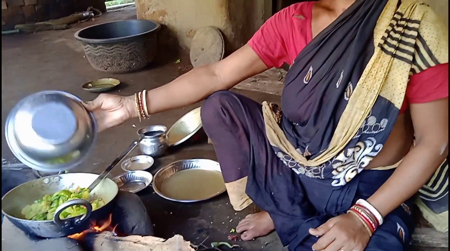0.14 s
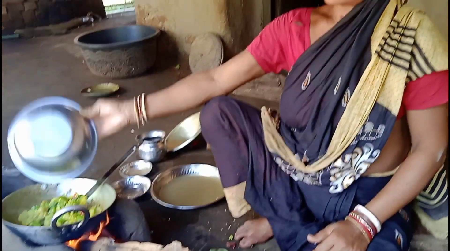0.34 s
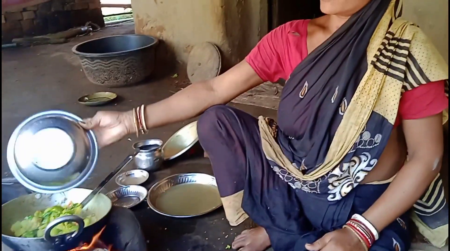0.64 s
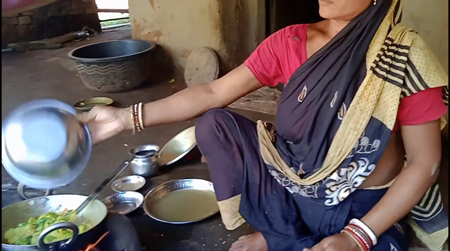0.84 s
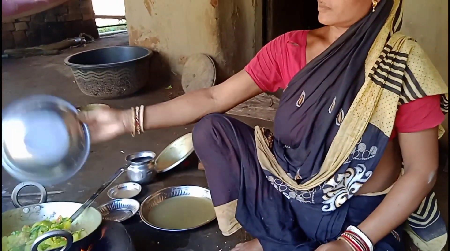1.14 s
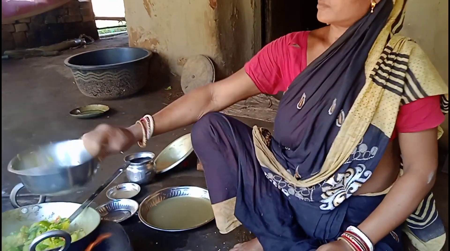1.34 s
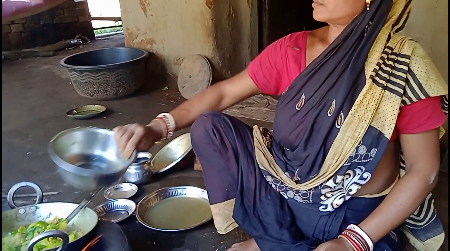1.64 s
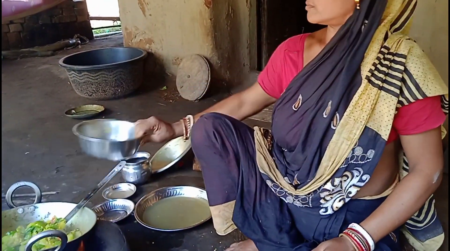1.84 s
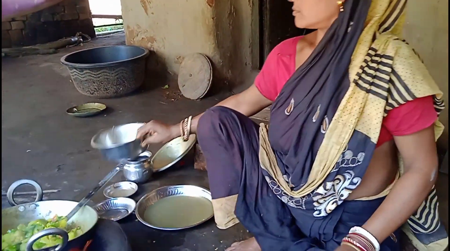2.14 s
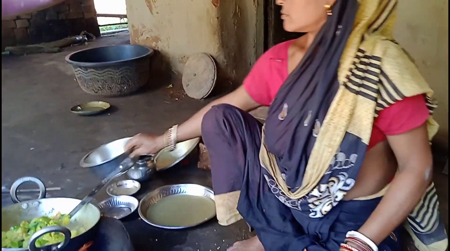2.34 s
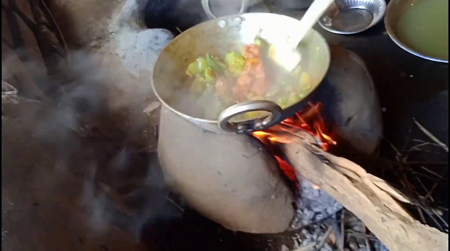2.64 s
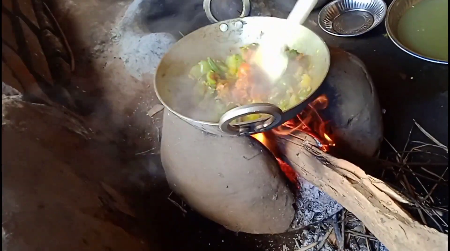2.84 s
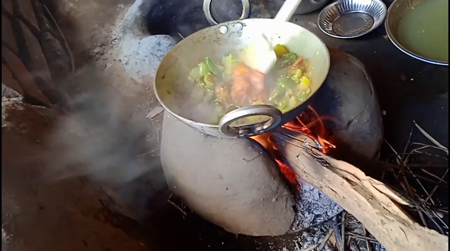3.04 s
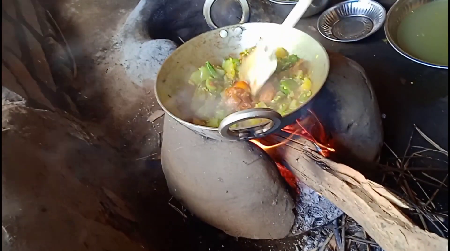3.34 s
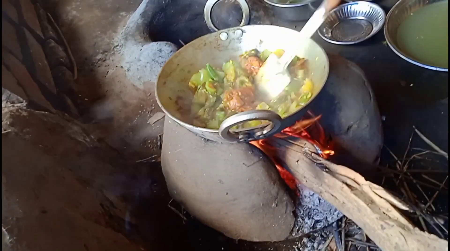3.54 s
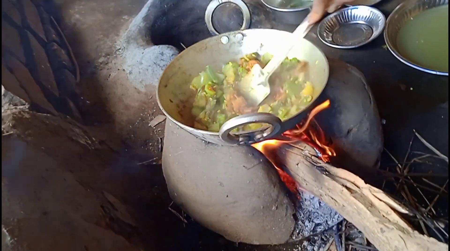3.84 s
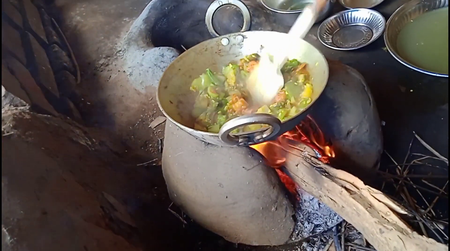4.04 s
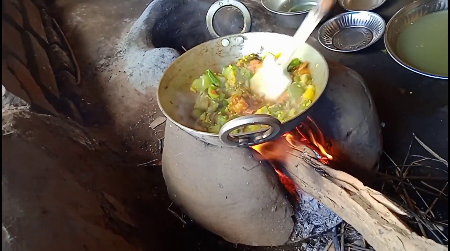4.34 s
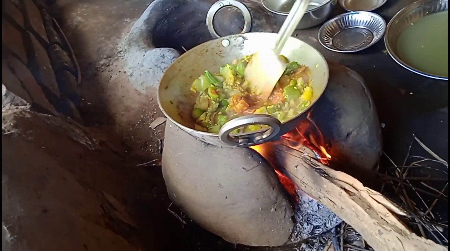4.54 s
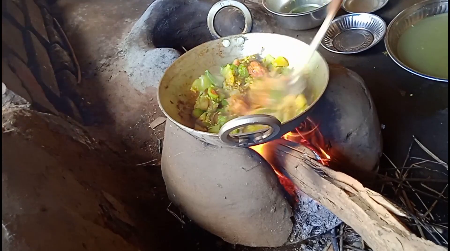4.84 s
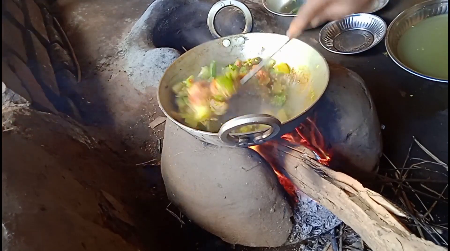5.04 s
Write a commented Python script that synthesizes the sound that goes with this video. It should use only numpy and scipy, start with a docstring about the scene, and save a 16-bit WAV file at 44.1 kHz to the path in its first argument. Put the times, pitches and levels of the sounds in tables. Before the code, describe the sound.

Moist, crackling frying over a low fire murmur, turning more resonant midway, with light bowl taps, soft knocks, then scraping and steel spatula clanks.

```python
"""Chopped vegetables sizzle in a metal pan on a wood-fired clay stove, heard first from the side, then from above.
The sizzle is random clicks and steam noise through a coloured response; the fire murmurs below as shaped noise.
A steel bowl is tapped empty (decaying modes), food is turned and a dull bump sinks in pitch.
A steel spatula strikes the pan in two groups of blows (modes and clatter) and scrapes along it (resonant friction).
Sparse decaying echoes stand for the near walls."""
import sys
import numpy as np
from scipy import signal
from scipy.fft import rfft, irfft
from scipy.io import wavfile
from scipy.ndimage import uniform_filter1d

SR = 44100
rng = np.random.default_rng(int(sys.argv[2]) if len(sys.argv) > 2 else 0)


def file_out(sig):
    """Save sig as 16-bit WAV at sys.argv[1]."""
    # one column per channel
    cols = np.atleast_2d(sig).T
    # limit, then scale
    lim = np.clip(cols, -1, 1)
    pcm = np.round(lim * 32767).astype(np.int16)
    wavfile.write(sys.argv[1], SR, pcm)


N = 228879
TIME, FREQ = np.arange(N) / SR, np.fft.rfftfreq(N, 1 / SR)  # s, Hz
RING_T = np.arange(SR // 2) / SR  # s since a blow
CLOSER_S = 1.662  # from here on the pan is heard from above

# Spatula blows and their bounces. Each row: start in seconds, relative levels in dB of the ring,
# the clatter and the squeak, place of impact from 0 (bottom) to 1 (wall).
SPATULA_BLOWS = [(4.038, -36.5, -38, -42, 0.66), (4.0496, -30.5, -31.5, -50, 0.0034),
                 (4.055, -42, -30.5, -30.5, 0), (4.064, -42, -42, -47, 0.42), (4.073, -45, -49, -41, 0),
                 (5.0981, -34, -36, -48, 0.81), (5.109, -33, -35, -36.5, 1), (5.115, -35, -41, -43, 1),
                 (5.129, -49, -40.5, -47, 1)]


def amp(db):
    """Logarithmic level: decibels to amplitude gain."""
    return 10 ** (np.asarray(db) / 20)


def unit(x):
    """Normalisation by signal power: scales to rms 1."""
    return x / np.sqrt(np.mean(x ** 2) + 1e-20)


def read(points, hz):
    """Spectral envelope: interpolates (Hz, value) points on a log-frequency axis."""
    f, value = np.transpose(points)
    return np.interp(np.log(hz + 1), np.log(f + 1), value)


def dying(t, t60):
    """Exponential decay, 60 dB down at t60."""
    return np.exp(-np.log(1000) * t / np.maximum(t60, 1e-3))


def onset(t, rise_s):
    """Exponential approach to full amplitude with time constant rise_s."""
    return 1 - np.exp(-t / rise_s)


def add(mix, s, sound):
    """Superposition: adds a sound to the mix from time s."""
    part = mix[max(round(s * SR), 0):][:len(sound)]
    part += sound[:len(part)]


def noise(colour, size):
    """Spectral shaping: white noise filtered to a given colour, at rms 1."""
    spectrum = rfft(rng.standard_normal(size))
    gain = amp(read(colour, np.fft.rfftfreq(size, 1 / SR)))
    return unit(irfft(spectrum * gain, size))


def wander(rate):
    """Random drift of rms 1: noise through a Gaussian low-pass at rate in Hz."""
    spectrum = rfft(rng.standard_normal(N))
    return unit(irfft(spectrum * np.exp(-(FREQ / rate) ** 2), N))


def bursts(per_s, spread_db, wash, flutter_db):
    """Random impulses of bursting bubbles over a noise wash of steam; their level flutters."""
    sizes = amp(spread_db * np.minimum(rng.exponential(1, N), 5))
    happens = rng.random(N) < per_s / SR
    clicks = sizes * rng.choice([-1, 1], N) * happens
    steam = wash * rng.standard_normal(N)
    return unit(unit(clicks) + steam) * amp(flutter_db * wander(rate=14))


def through_response(x, gain):
    """Minimum-phase filtering: each click rings after it bursts; the result has rms 1."""
    cepstrum = irfft(np.log(gain + 1e-5), N)
    response = np.exp(rfft(cepstrum * 2 * (np.arange(N) < N // 2)))
    return unit(irfft(rfft(x) * response, N))


def sizzle(levels, colour_db, split_hz):
    """Band splitting: wet bubbling dominates below split_hz and fine spray above it."""
    wet_level, spray_level = levels
    high = 1 / (1 + (split_hz / (FREQ + 1)) ** 6)  # share of power
    wet = bursts(per_s=2200, spread_db=2.0, wash=0.85, flutter_db=0.83)
    spray = bursts(per_s=4000, spread_db=-0.5, wash=1.0, flutter_db=0.76)
    out = np.zeros(N)
    for clicks, share, level_db in ((wet, 1 - high, wet_level), (spray, high, spray_level)):
        out += through_response(clicks, amp(colour_db) * np.sqrt(share)) * amp(level_db)
    return out


def frying_levels(drying, since_s):
    """Drying as a steady fall in dB, plus a cosine-squared swell at each flare-up."""
    # Flare-ups as moist food meets hot metal. Each row: peak time in seconds, length in seconds,
    # lift of the bubbling in dB, lift of the spray in dB.
    flare_ups = [(0.04, 0.22, 1.6, 0.5), (1.92, .44, 3.0, 3.3), (2.246, 0.28, 2.5, 3.6),
                 (2.845, 0.66, 1.1, -0.3), (3.447, 0.16, 3.5, 0.5), (3.81, 0.61, 2.6, 2.0),
                 (4.234, 0.7, 4, 4.5), (4.99, 0.13, 1.5, 0.5)]
    start_db, fall = np.transpose(drying)
    levels = start_db[:, None] - fall[:, None] * (TIME - since_s)
    for s, length, wet_db, spray_db in flare_ups:
        swell = np.cos(np.pi * np.clip((TIME - s) / length, -.5, .5)) ** 2
        levels = levels + np.outer([wet_db, spray_db], swell)
    return levels


def pan_colour():
    """Resonant filtering: the sum of Lorentzian lifts and dips of the pan, in dB."""
    # Resonances and dips of the pan. Each row: frequency in Hz, width in Hz, lift in dB before any scaling.
    pan_resonances = [(444, 47, 14), (500, 25, -2.5), (721, 36, 7), (826, 13, -7), (1010, 41, 3),
                      (1424, 14, 5.5), (1748, 31, -13), (1980, 18, 9.5), (2035, 23, 9), (2150, 180, -5),
                      (2400, 130, 2.5), (2700, 52, 5.5), (3810, 220, 4.5), (4220, 45, 2)]
    return sum(db / (1 + (2 * (FREQ - hz) / width) ** 2) for hz, width, db in pan_resonances)


def shifting(x, patchy_db=1.11):
    """Time-varying spectrum: single pieces flare up and dry out, so the colour drifts in patches."""
    z = signal.stft(x, nperseg=1024)[2]
    patches = rng.standard_normal(z.shape)
    for axis in (0, 1):
        patches = uniform_filter1d(patches, size=9, axis=axis)
    return signal.istft(z * amp(patchy_db * unit(patches)))[1][:N]


def vegetables():
    """Frying as filtered impulse noise from two places; from above the pan's resonances stand out."""
    # Sizzle spectra from the side and from above. Each row: frequency in Hz, relative density in dB per Hz.
    side_colour = [(150, -55), (350, -19), (600, -12.5), (790, -10), (1080, -7), (1500, -17), (2000, -6),
                   (2900, -6.5), (3450, -1.5), (4270, -9.5), (4900, -4.5), (5900, 1.2), (7300, -2.5),
                   (10500, -8), (13600, -10)]
    top_colour = [(150, -35), (380, -33), (600, -13), (1100, -14.5), (1400, -5.5), (1750, -2.5),
                  (2700, -2.1), (3300, -2.5), (3900, -5), (4500, -5.5), (5200, -7.5), (6200, -0.5),
                  (7400, -6), (8200, -15.5), (13600, -17)]
    # Drying food; first bubbling, then spray. Each row: relative starting level in dB, fall in dB per second.
    side_drying = [(-49, 2.5), (-50, 5.5)]
    top_drying = [(-49.5, 0.86), (-51, 0.75)]
    side = sizzle(frying_levels(side_drying, 0), read(side_colour, FREQ), split_hz=5570)
    top_db = read(top_colour, FREQ) + pan_colour()
    top = sizzle(frying_levels(top_drying, CLOSER_S), top_db, split_hz=5260)
    return shifting(np.where(TIME < CLOSER_S, side, top))


def fire(level_db=5):
    """Low turbulent murmur of the flames: shaped noise whose level flickers."""
    # Spectrum of the flames. Each row: frequency in Hz, relative density in dB per Hz.
    flame_colour = [(20, -27), (40, -16), (80, -6.5), (135, -1), (220, -4), (400, -10.5), (800, -24.5)]
    # Course of the murmur. Each row: time in seconds, level in dB relative to level_db.
    murmur = [(0.0, -78.5), (1.42, -78), (1.78, -75), (4.88, -79.5), (5.19, -77)]
    flicker_db = 1.5 * wander(rate=10)
    course_db = np.interp(TIME, *np.transpose(murmur))
    return noise(flame_colour, N) * amp(course_db + level_db + flicker_db)


def knocks(rise_s=0.0014):
    """Damped impacts: soft knocks of handling and of turned food, as decaying low noise."""
    # Soft knocks. Each row: start in seconds, relative level in dB, t60 in seconds.
    soft_knocks = [(0.326, -60, .12), (1.925, -57, 0.18), (3.134, -59, .25), (3.413, -47, 0.077),
                   (3.686, -53.5, 0.1), (3.724, -58, 0.059)]
    # Their spectrum. Each row: frequency in Hz, relative density in dB per Hz.
    knock_colour = [(25, -35), (60, -20), (140, -6.5), (280, -8), (520, -9), (1200, -27), (3000, -38)]
    out = np.zeros(N)
    for s, db, t60 in soft_knocks:
        shape = dying(RING_T, t60) * onset(RING_T, rise_s)
        add(out, s, amp(db) * noise(knock_colour, len(RING_T)) * shape)
    return out


def rubbed(hz, width_hz, grit_db):
    """Friction noise of rms 1 through a two-pole-pair resonance that follows the curve hz."""
    lead = SR // 20  # lets the resonance settle first
    size = len(hz)
    slips = wander(rate=300)
    grit = (rng.standard_normal(N) * amp(grit_db * slips))[:size + lead]
    r = np.exp(-np.pi * abs(width_hz) / SR)
    # shift the resonance to 0 Hz, filter there, shift back
    turn = np.exp(2j * np.pi * np.cumsum(np.pad(hz, (lead, 0), "edge")) / SR)
    stroke = (turn * signal.lfilter([1], np.poly([r, r]), grit / turn)).real
    return unit(np.diff(stroke)[-size:])


def push(grit_db, taper=0.62):
    """Firm push into the food: a friction resonance that sinks while the blade's force judders."""
    length, first_hz, last_hz, width_hz = .18, 1430, 466, 670  # s, Hz, Hz, pole width Hz
    t = np.arange(0, length, 1 / SR)
    sinking_hz = first_hz * (last_hz / first_hz) ** (t / length)
    judder_db = 4 * np.cos(2 * np.pi * 32 * t)  # 32 judders per s
    force = signal.windows.tukey(len(t), taper) * amp(judder_db)
    return unit(force * rubbed(sinking_hz, width_hz, grit_db))


def scraping(grit_db=3.0, through_pan=0.8, catch_rise_s=0.0052):
    """Friction through the pan: light rubs, squeaks at the blows, and a push that ends in a scuff."""
    # Light rubs of food and blade on the metal. Each row: start in seconds, length in seconds,
    # frequency in Hz, pole width in Hz, relative level in dB.
    light_rubs = [(1.136, .12, 410, 400, -70), (3.763, 0.18, 2100, 1300, -54.5),
                  (4.08, .11, 6340, 350, -53), (4.146, 0.12, 6240, 1470, -49.5),
                  (5.16, 0.03, 6500, 1400, -48)]
    # Scuff as the blade catches, then the ring it leaves in the pan. Each row: frequency in Hz,
    # pole width in Hz, t60 in seconds, relative level in dB.
    catch_parts = [(600, 380, 0.068, -42), (722, 25, .13, -45.5)]
    out = np.zeros(N)
    # the blade skids at each blow: length s, Hz, pole width Hz
    squeaks = [(s, 0.012, 6110, 240, squeak_db) for s, _, _, squeak_db, _ in SPATULA_BLOWS]
    for s, length, hz, width, db in light_rubs + squeaks:
        size = max(int(length * SR), 20)
        shape = unit(signal.windows.tukey(size, .5))
        add(out, s, amp(db) * rubbed(np.full(size, hz), width, grit_db) * shape)
    add(out, 4.16, amp(-51.5) * push(grit_db))
    for hz, width, t60, db in catch_parts:
        t = np.arange(0, t60, 1 / SR)
        shape = onset(t, catch_rise_s) * dying(t, t60)
        add(out, 4.343, amp(db) * shape * rubbed(np.full(len(t), hz), width, grit_db))
    return irfft(rfft(out) * amp(through_pan * pan_colour()), N)


def ring(hz, t60, db):
    """Modal synthesis: decaying sines of a struck piece of metal, in random phase."""
    phase = 2 * np.pi * rng.random((len(hz), 1))
    modes = dying(RING_T, t60[:, None]) * np.sin(2 * np.pi * hz[:, None] * RING_T + phase)
    return amp(db) @ modes


def bowl(tick_db=-1, tick_t60=0.082):
    """Modal ringing with contact noise: light taps on the hand-held steel bowl."""
    # Bowl modes. Each row: frequency in Hz, t60 in seconds, relative level in dB.
    bowl_modes = [(2960, .18, -16), (3370, 0.15, -8), (3670, .14, -11.5), (4330, 0.082, -7.5),
                  (4950, .085, 2), (5410, .25, -16), (7000, .16, -16)]
    # Contact noise spectrum. Each row: frequency in Hz, relative density in dB per Hz.
    tick_colour = [(1500, -27), (3200, -8), (4700, 8), (8000, -4.5), (13500, -10)]
    # Taps. Each row: start in seconds, relative level in dB.
    taps = [(1.193, -41.5), (1.199, -48), (1.224, -46.5)]
    out = np.zeros(N)
    for s, db in taps:
        tick = amp(tick_db) * noise(tick_colour, len(RING_T)) * dying(RING_T, tick_t60)
        add(out, s, amp(db) * (ring(*np.transpose(bowl_modes)) + tick))
    return out


def bump(rise_s=.001):
    """Frequency glide: a close, dry, dull thud whose decaying sine sinks in pitch."""
    first_hz, last_hz, glide_t60, t60 = 300, 55, 0.025, 0.08  # Hz, Hz, s, s
    out = np.zeros(N)
    hz = last_hz + (first_hz - last_hz) * dying(RING_T, glide_t60)
    shape = onset(RING_T, rise_s) * dying(RING_T, t60)
    add(out, 1.5429, -amp(-42.5) * shape * np.sin(2 * np.pi * np.cumsum(hz) / SR))
    return out


def spatula(clatter_t60=0.086, waver=0.77, rise_s=0.00075, wall_dull_db=-6, dull_hz=8500, lowest_hz=150):
    """Modal excitation by place of impact; the blade resting on the metal makes the modes waver in phase."""
    # Pan modes. Each row: frequency in Hz, t60 in seconds, relative level in dB when struck on the bottom,
    # relative level in dB when struck on the wall.
    pan_modes = [(298, 0.054, -13.5, -11.5), (482, 0.07, -12, -14), (702, 0.044, -8, -2),
                 (722, 0.097, -18, -17), (1158, 0.15, -22, -12), (1565, 0.26, -23, -8),
                 (1753, 0.13, -20, -22), (2038, 0.093, -3, -13), (2110, 0.23, 1, -8.5),
                 (2218, 0.058, -2, 2), (2430, 0.18, -11.5, -12), (2843, 0.45, -18, -4.5),
                 (3538, 0.24, -11, -6.5), (4140, 0.044, -18, -5), (5290, 0.29, -16.5, -12.5),
                 (6240, .09, -16, -19), (6266, 0.61, -17, -16), (6900, 0.14, -1.5, -11),
                 (7290, 0.16, -25, -6.5), (7480, 0.081, 0, -28), (9798, 0.15, -27, -37)]
    # Dense, quickly dying clatter of steel on the pan. Each row: frequency in Hz, relative density in dB per Hz.
    clatter_colour = [(100, -31), (270, -10), (550, 4), (900, -7), (2300, 1.5), (4500, 0), (7400, -2.5),
                      (8200, -10), (13500, -10)]
    hz, t60, bottom_db, wall_db = np.transpose(pan_modes)
    out, energy = np.zeros(N), np.zeros((len(hz), N))
    rise = onset(RING_T, rise_s)
    for s, ring_db, clatter_db, _, place in SPATULA_BLOWS:
        mode_db = ring_db + bottom_db + np.clip(place, 0, 1) * (wall_db - bottom_db)
        for mode, db, life in zip(energy, mode_db, t60):
            add(mode, s, (amp(db) * rise * dying(RING_T, life)) ** 2)
        # a glancing blow on the wall has less top treble
        colour = [(f, db + place * wall_dull_db * (f > dull_hz)) for f, db in clatter_colour]
        clatter = noise(colour, len(RING_T)) * rise * dying(RING_T, clatter_t60)
        add(out, s, amp(clatter_db) * clatter)
    drift = waver * wander(rate=39.5)  # phase in radians
    for mode, f in zip(energy, hz):
        phase = 2 * np.pi * (f * TIME + rng.random()) + np.roll(drift, rng.integers(N))
        out += np.sqrt(mode) * np.sin(phase)
    # the blows carry no deep bass below lowest_hz
    return signal.sosfilt(signal.butter(2, lowest_hz, "high", fs=SR, output="sos"), out)


def room(x):
    """Reverberation by sparse echoes of the clay walls, with a frequency-dependent decay."""
    # Decay of the echoes. Each row: frequency in Hz, t60 in seconds.
    wall_decay = [(200, 0.32), (2000, 0.19), (7000, 0.13), (15000, 0.15)]
    happens = rng.random(len(RING_T)) < 2500 / SR  # 2500 echoes per s
    echoes = rng.standard_normal(len(RING_T)) * happens * (RING_T > .004)
    hz, t, z = signal.stft(echoes, SR, nperseg=256)
    tail = signal.istft(z * dying(t, read(wall_decay, hz)[:, None]), SR)[1]
    return signal.fftconvolve(x, tail / np.linalg.norm(tail))[:N]


def scene():
    """Superposition of direct and reflected sound, the same in both channels."""
    frying = vegetables()
    handling = spatula() + scraping() + bowl() + knocks()
    echo = room(amp(-11.5) * frying + amp(-11.0) * handling)
    mix = amp(-1.45) * frying + handling + bump() + fire() + echo
    return np.array([mix, mix])


def record(dry):
    """Linear filtering by a microphone with a lift in the top treble, then a steep low-pass."""
    # Microphone response. Each row: frequency in Hz, gain in dB.
    microphone = [(25, -8), (60, -0.5), (13900, 0), (14600, 11), (15300, 12)]
    coloured = irfft(rfft(dry) * amp(read(microphone, FREQ)), N)
    low_pass = signal.firwin(1601, 15520, window=("kaiser", 8), fs=SR)  # edge in Hz
    return signal.oaconvolve(coloured, low_pass[None], "same")


dry = scene()
out = record(dry)
file_out(out)
```